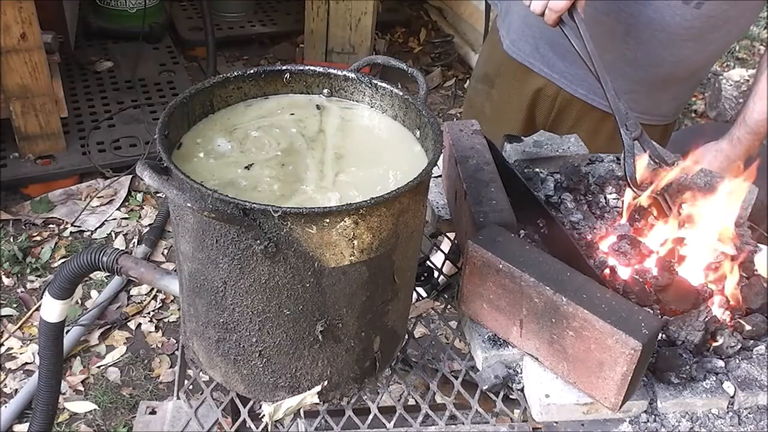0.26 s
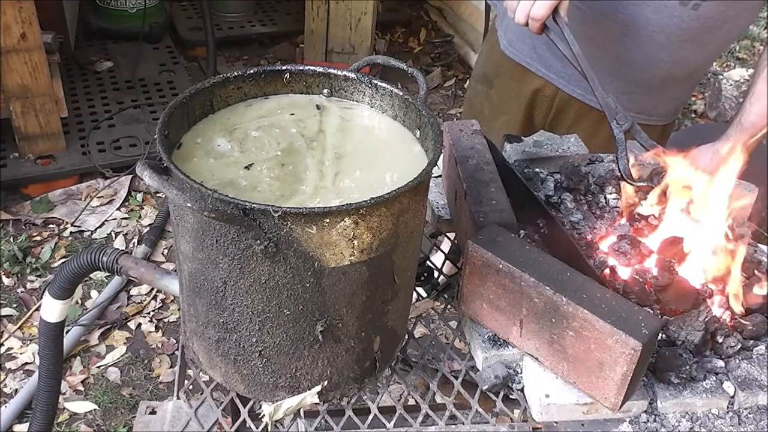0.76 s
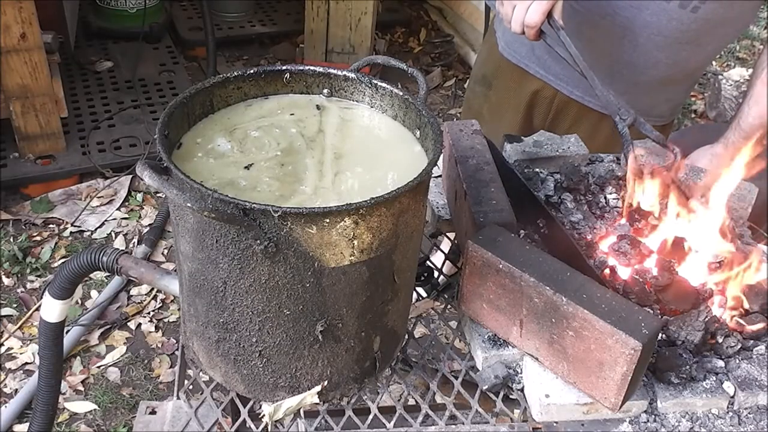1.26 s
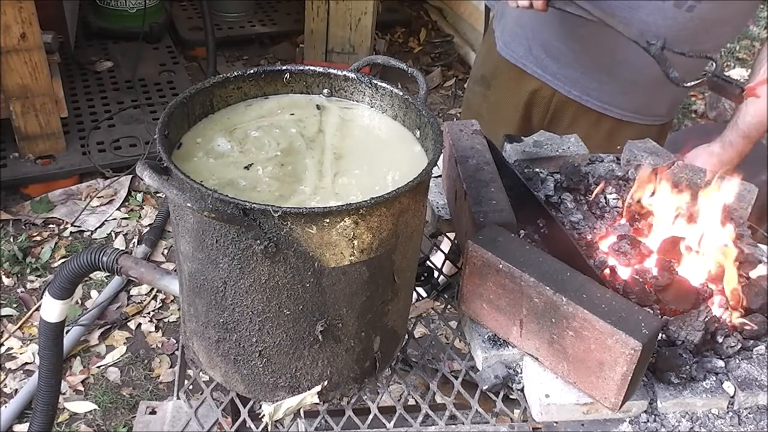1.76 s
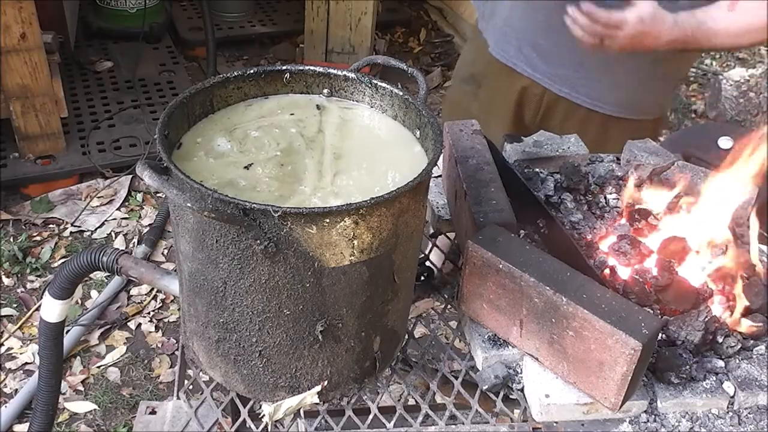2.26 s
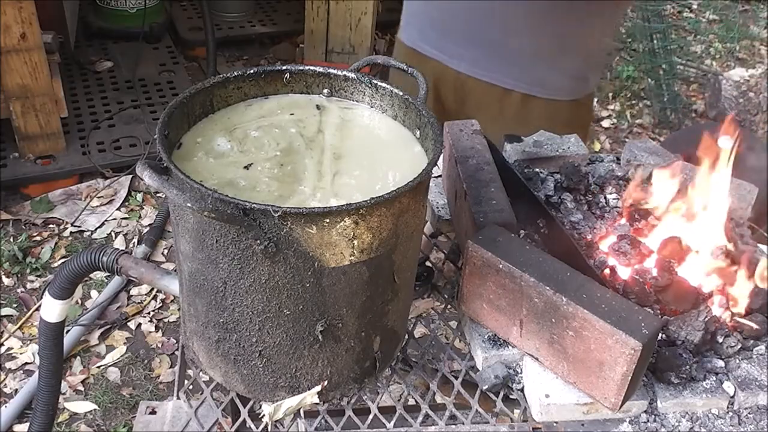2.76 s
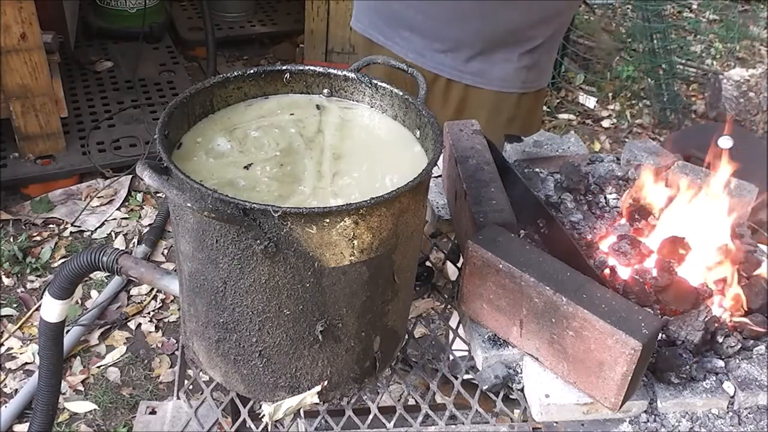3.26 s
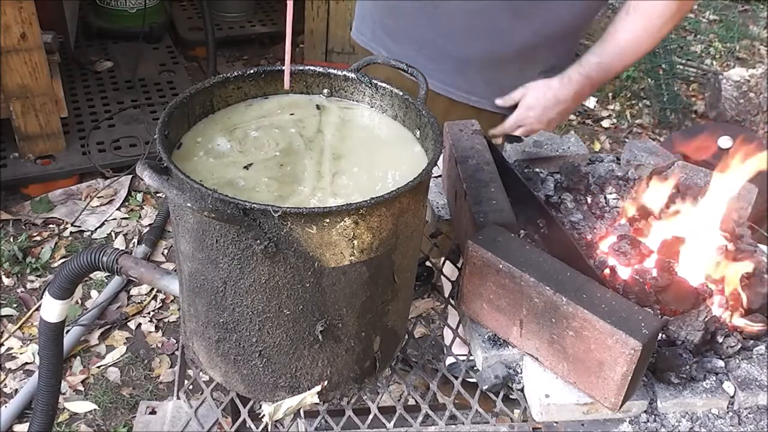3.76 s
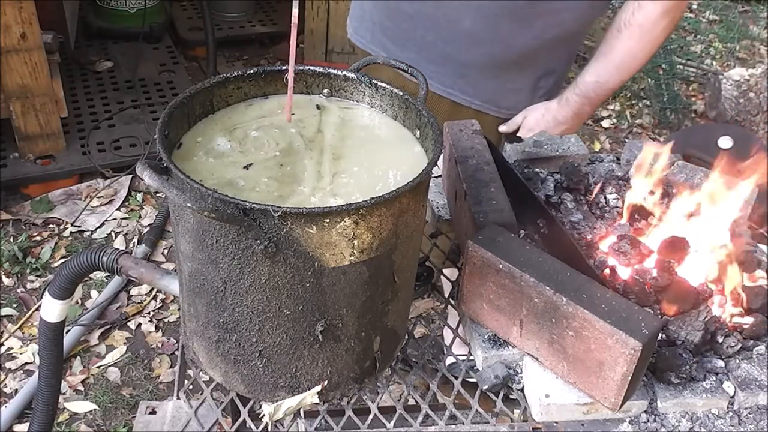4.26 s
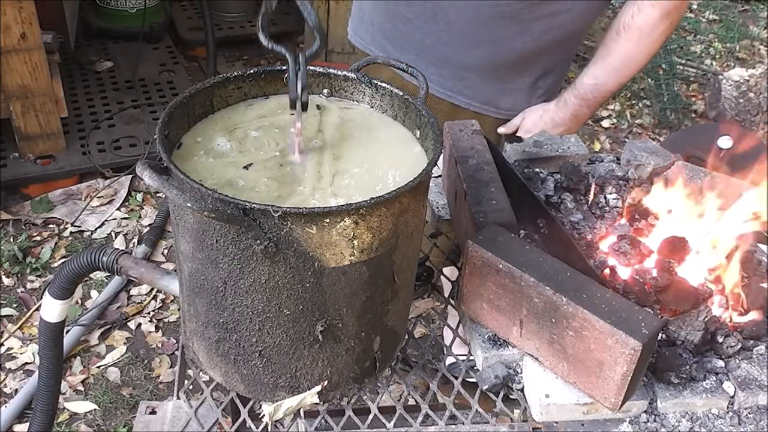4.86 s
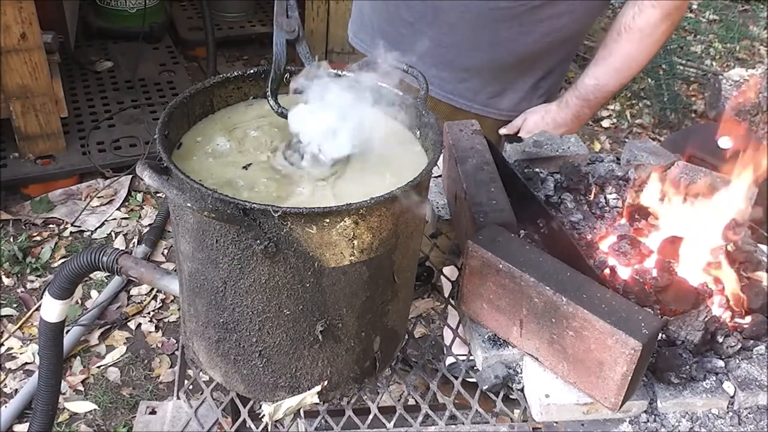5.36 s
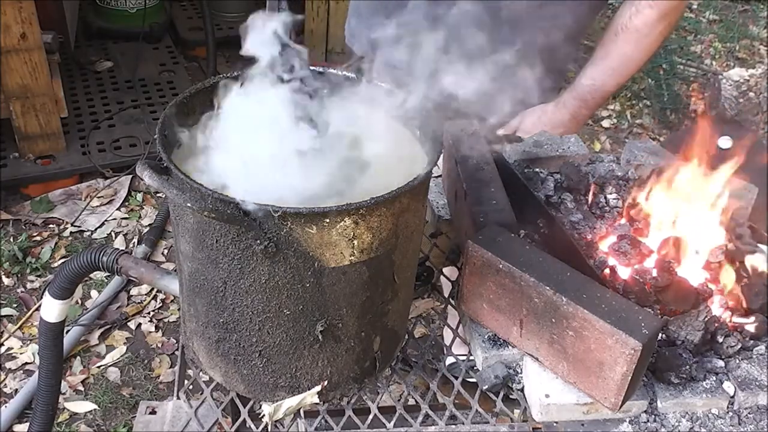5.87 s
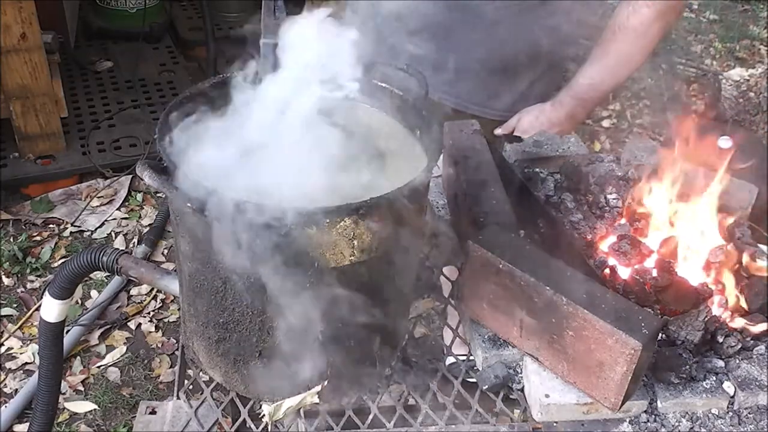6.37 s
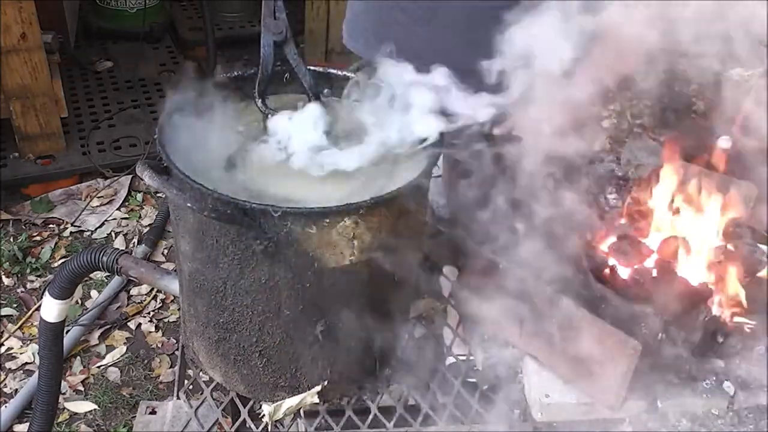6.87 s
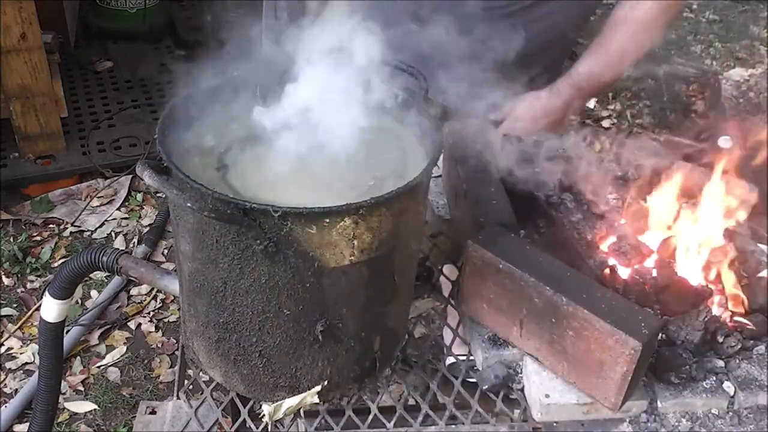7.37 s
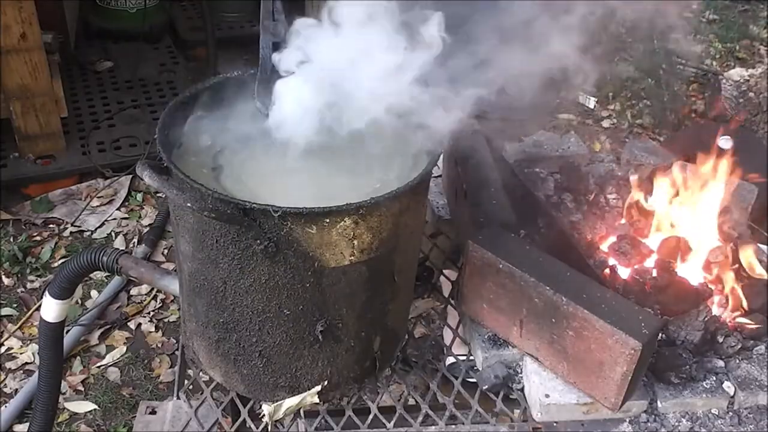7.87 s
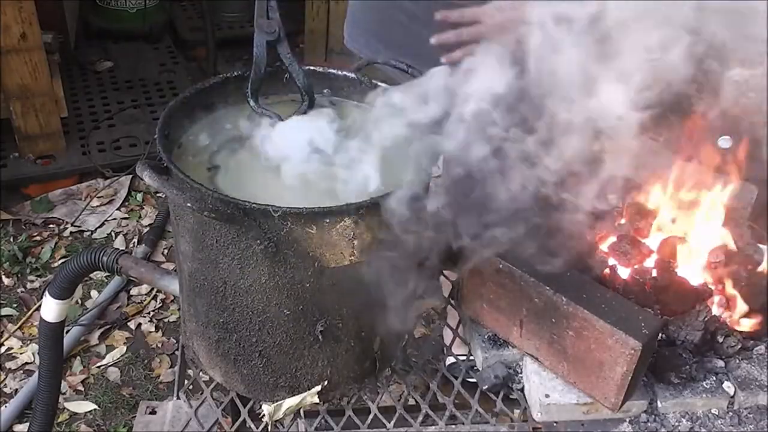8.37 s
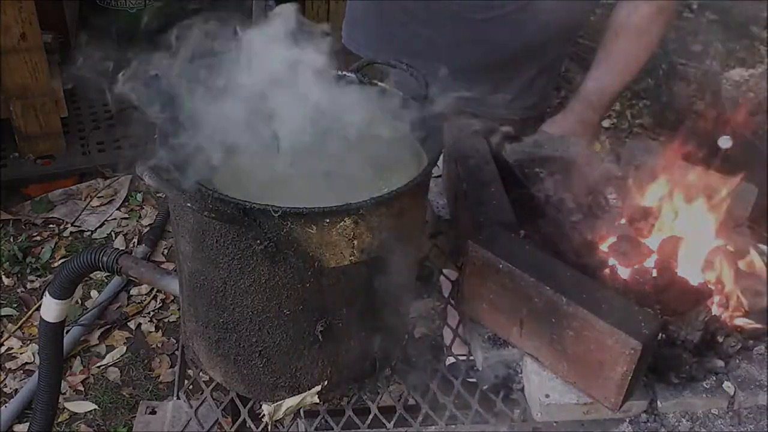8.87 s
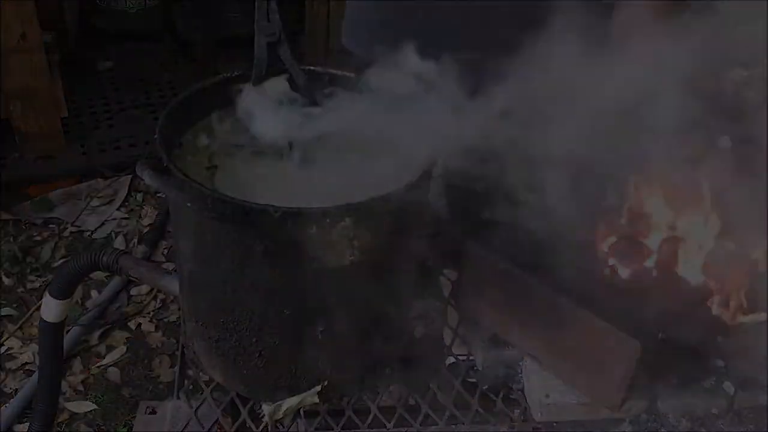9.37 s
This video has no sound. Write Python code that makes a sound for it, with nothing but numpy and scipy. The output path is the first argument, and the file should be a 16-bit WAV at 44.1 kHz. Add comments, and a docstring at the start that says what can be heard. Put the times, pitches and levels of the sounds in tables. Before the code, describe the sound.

Steady whine and airy rush of an outdoor forge blower, joined by the sizzling and sharp spitting of hot steel quenched in oil.

```python
"""An electric blower whines steadily outdoors, pushing air through a hose into a forge fire.
Its passing blades make the tone; the turbulent air rushes and rings in hose and housing.
Beside it, from 5 s, red-hot steel sinks into a pot of oil, which sizzles with bursting bubbles and spits.
Heard close up on a two-port stereo microphone. The level dips briefly at the sharpest spits,
and the whole scene fades from about 6 s."""
import sys
import numpy as np
from scipy import signal
from scipy.fft import rfft, irfft, next_fast_len
from scipy.io import wavfile
from scipy.ndimage import uniform_filter1d

SR = 44100
rng = np.random.default_rng(int(sys.argv[2]) if len(sys.argv) > 2 else 0)


def dump(signal):
    """Clip the signal to [-1, 1] and save it as 16-bit WAV at the path in sys.argv[1]."""
    limited = np.clip(np.atleast_2d(signal).T, -1, 1)
    pcm = np.round(limited * 32767).astype(np.int16)
    wavfile.write(sys.argv[1], SR, pcm)


N = 423801
T = np.arange(N) / SR
N_FFT = next_fast_len(N)
HZ = np.arange(N_FFT // 2 + 1) * SR / N_FFT + 1e-9

# blade-passing tone at the blower: (time [s], pitch [Hz])
BLADE_PITCH = [(0, 580.5), (1, 581.3), (4.4, 582.25), (7.4, 581.3), (8.8, 581.9)]
# its wavering overtones, against the blade tone: (time [s], 2nd [dB], 3rd [dB], 6th [dB])
BLADE_OVERTONES = [(0, -25.5, -30, -42), (.45, -25.5, -31, -44), (.85, -21.5, -32, -43),
                   (2.05, -19.5, -31.5, -47), (2.45, -30, -28.5, -40), (2.7, -18, -27.5, -37),
                   (3.5, -20.5, -37, -35.5), (5.2, -22, -30, -36), (6.1, -26, -34.5, -37),
                   (7.25, -28.5, -42, -36.5), (8.2, -24.5, -41, -37), (9.61, -22, -36, -37)]
# its faint overtones, against the blade tone: (multiple, level [dB])
FAINT_OVERTONES = [(4, -43), (8, -41), (11, -38), (14, -50)]
# thin motor tone, against the blade tone: (time [s], level [dB])
MOTOR_LEVEL = [(0, -23), (2.6, -26), (2.85, -28), (5, -28.5), (9.61, -27.5)]


def blower_whine(motor_hz=1520.5):
    """The blower, close by: passing blades and the motor give clean, slightly wavering sines."""
    phase = 2 * np.pi * np.cumsum(over_time(BLADE_PITCH)[0]) / SR
    blades = undb(.12 * walk(12) + .22 * walk(30)) * np.sin(phase + .02 * walk(40))
    for multiple, db in [*zip((2, 3, 6), over_time(BLADE_OVERTONES)), *FAINT_OVERTONES]:
        blades += undb(db + walk(14)) * np.sin(multiple * phase + .12 * walk(8))
    motor_gain = undb(over_time(MOTOR_LEVEL)[0] + .7 * walk(12))
    motor = motor_gain * np.sin(2 * np.pi * motor_hz * T + .17 * walk(8))
    return to_wave(microphone(rfft(np.sqrt(2) * (blades + motor), N_FFT)))


# colour of the air on its way to the fire: (frequency [Hz], level [dB])
AIR_SPECTRUM = [(28, -14.5), (60, -11), (120, -3), (255, -6.5), (330, 1), (700, 0.5), (1150, -5),
                (1700, -4), (2600, -16), (3300, -14.5), (5000, -3.5), (6800, -10.5), (10500, -7.5),
                (15700, -23)]
# resonances of hose and housing: (frequency [Hz], width [Hz], gain [dB])
HOSE_MODES = [(120, 22, -1.5), (1178, 98, 4), (1733, 30, 1.5), (3660, 90, 3.5), (4100, 76, 4),
              (4480, 68, 1.5), (5050, 50, -1), (5130, 110, 0), (7940, 330, 2.5), (8930, 710, -3),
              (10240, 430, -1.5)]


def air_rush():
    """Turbulent air in the hose: the bass holds steady, the half-octave bands above it gust together."""
    colour = undb(over_hz(AIR_SPECTRUM) + resonances_db(HOSE_MODES))
    air = colour * microphone(*rfft(rng.standard_normal((2, N_FFT))), spread=1)
    gust_db = .5 * walk(32) + .47 * walk(70)
    octave = np.log2(HZ)
    bass = (octave < 9.5) * np.cos(np.pi * np.clip(octave - 9, 0, .5)) ** 2
    out = to_wave(air * bass)
    for centre in np.arange(9.5, 14.6, .5):
        band = np.cos(np.pi * np.clip(octave - centre, -.5, .5)) ** 2  # neighbours sum to one
        flicker_db = .21 * walk(18)
        out += undb(gust_db + flicker_db) * to_wave(air * band)
    return at_rms(out, -13)


# ring of bursting bubbles, the larger ones longer: (pitch [Hz], width [octaves], level [dB])
BUBBLE_RINGS = [(4200, 0.099, 7), (5030, 0.092, 6), (5680, .05, 8), (7450, 0.11, -0.5), (9500, .35, 3),
                (12800, 0.36, 3.5)]
# colour of the sizzling oil: (frequency [Hz], level [dB])
SIZZLE_SPECTRUM = [(1500, -32), (2900, -15), (4200, -7.5), (5500, -4.5), (7000, -10), (10600, 0),
                   (13500, -5), (15700, -10.5)]
# the pot rings along with the oil: (frequency [Hz], width [Hz], gain [dB])
POT_MODES = [(4080, 130, 4), (5680, 150, 6.5), (7860, 400, 3)]
# how hard the oil boils once the steel is in: (time [s], level [dB])
BOIL_LEVEL = [(4.97, -30), (5.1, -8.5), (5.38, -0.5), (5.55, -5.5), (6.05, 0.5), (6.7, -2.5), (7.5, -1.5),
              (8.1, -3.5), (9.61, -2.5)]


def oil_sizzle(count=20000):
    """In the pot beside the blower, bubbles burst, mostly faint, over a hiss that comes in spurts."""
    when, size, sign = rng.random((count, 3)).T
    bursts = undb(np.minimum(-3.5 * np.log(size), 14.5)) * np.sign(sign - .5)
    kinds, index = len(BUBBLE_RINGS), np.arange(count)
    clicks = np.zeros((kinds, 2, N_FFT))  # two unrelated streams for each bubble size
    np.add.at(clicks, (index % kinds, index // kinds % 2, (when * N).astype(int)), bursts)
    bubbles = sum(rfft(streams) * undb(db) / (1 + 1j * np.log2(HZ / hz) / width)
                  for streams, (hz, width, db) in zip(clicks, BUBBLE_RINGS))
    hiss = undb(3 * walk(60) + 2.6 * walk(40)) * rng.standard_normal((2, N))
    oil = at_rms(to_wave(bubbles), 0) + at_rms(hiss, -2.3)
    colour = undb(over_hz(SIZZLE_SPECTRUM) + resonances_db(POT_MODES))
    sizzle = to_wave(colour * microphone(*rfft(oil, N_FFT), spread=.21))
    boil = undb(over_time(BOIL_LEVEL)[0]) * (T > BOIL_LEVEL[0][0])
    return at_rms(sizzle, -14.5) * boil


# the loudest spits from the pot: (time [s], level before the ceiling [dB], pitch [Hz])
LOUD_SPITS = [(5.296, -12, 8600), (5.339, -6.5, 8200), (5.412, -8.5, 7400), (5.626, -10, 5900),
              (5.689, -6, 5900), (5.706, -8.5, 9200), (5.743, -7, 9400), (5.774, -9.5, 7800),
              (5.982, -9.5, 6500), (6.041, -9.5, 7800), (6.112, -8, 12300), (6.188, -8.5, 9200),
              (6.26, -6, 11600), (6.291, -9, 7400), (6.414, -8, 8900), (6.528, -9.2, 5640),
              (6.595, -10, 6400), (6.637, -7, 5600), (6.655, -6, 9900), (6.716, -8, 6190),
              (6.795, -6.5, 8100), (6.813, -7.5, 10600), (6.894, -5, 11100), (6.916, -7, 7700),
              (6.951, -7.5, 9400), (7.001, -6, 7400), (7.085, -10, 5900), (7.284, -8, 5570),
              (7.36, -7.5, 9200), (7.462, -7.5, 5300), (7.485, -5.5, 11300), (7.543, -4.5, 6100),
              (7.624, -10, 6700), (7.711, -6.5, 9000), (7.815, -7.5, 7600), (7.84, -8, 9500),
              (7.937, -7.5, 5970), (8.107, -9.5, 5400), (8.194, -5.5, 9500), (8.303, -7, 8400),
              (8.427, -6.3, 7900), (8.6, -7.2, 7500), (8.688, -10, 7640), (9.048, -10, 5290),
              (9.145, -7.5, 8500), (9.423, -7, 7200), (9.531, -6, 9200)]
SPIT_CEILING_DB = -9


def oil_spits():
    """Each spit is a snap of a cycle or two that returns off the pot wall, louder and at another pitch."""
    out, age = np.zeros(N_FFT), np.arange(60) / SR
    spits = [*LOUD_SPITS, *small_spits()]
    for (time, db, hz), (lag, shift) in zip(spits, rng.random((len(spits), 2))):
        db = min(db, SPIT_CEILING_DB)
        start = int(time * SR) - 12
        echo = (start + int(12 + 10 * lag), hz * (.65 + .52 * shift), db + 9)
        for at, snap_hz, snap_db in ((start, hz, db), echo):
            snap = np.sin(2 * np.pi * snap_hz * age) * np.exp(-age * snap_hz / 1.1)
            out[at:at + len(age)] += undb(snap_db) * snap / snap.max()
    low_cut = HZ ** 2 / (HZ ** 2 + 3500 ** 2)  # small bubbles send out little bass
    return to_wave(low_cut * undb(resonances_db(POT_MODES)) * microphone(rfft(out)))


def small_spits(count=70, from_s=5.2, low_hz=5200, high_hz=9500):
    """Fainter spits at chance moments while the oil boils: (time [s], level [dB], pitch [Hz])."""
    when, size, pitch = rng.random((count, 3)).T
    times = from_s + when * (T[-100] - from_s)
    return np.transpose([times, -15.5 + 5 * (size - .5), low_hz + pitch * (high_hz - low_hz)])


def level_dips(recovery_s=.042):
    """A gain that drops at once by a spit's excess over the ceiling, then creeps back."""
    db = np.zeros(N)
    for time, spit_db, _ in LOUD_SPITS:
        start = int(time * SR)
        excess_db = max(spit_db - SPIT_CEILING_DB, 0)
        db[start:] -= excess_db * np.exp(-(T[:N - start] / recovery_s) ** 2)
    return undb(db)


def faint_whistles(count=70):
    """In the background, short rising whistles are scattered through the rush."""
    out, age = np.zeros(N_FFT), np.arange(1300) / SR
    for when, pitch, glide, faintness in rng.random((count, 4)):
        hz = (3900 + 1500 * pitch) * (1 + 1.8 * glide * age)
        whistle = np.hanning(len(age)) * np.sin(2 * np.pi * np.cumsum(hz) / SR)
        start = int(when * (N - len(age)))
        out[start:start + len(age)] += undb(-26 - 7 * faintness) * whistle
    return to_wave(microphone(rfft(out)))


# how alike the two microphone ports sound: (frequency [Hz], likeness [0-1])
PORT_LIKENESS = [(30, 0.022), (45, .1), (60, 0.54), (130, .97), (290, 1), (640, 1), (1410, 0.7),
                 (3100, 0.91), (6820, 0.61), (9000, 0.17), (11500, 0.32), (15000, .2)]
# left port minus right: (frequency [Hz], level [dB])
PORT_BALANCE = [(25, -6), (110, 0), (380, -.5), (600, 0.3), (1290, 2), (2380, 2.5), (4400, 1), (8120, 4.5),
                (11500, 4.5), (15000, -3)]
# how far the left port leads: (frequency [Hz], phase [rad])
PORT_LEAD = [(0, -1.8), (520, 0.33), (3960, 0.22), (6120, 0.037), (7750, 0.51), (8270, 0.45), (8530, 1),
             (9220, -0.71), (10500, -0.82), (10800, -1.8), (11400, -1.2), (13200, -0.47), (14200, -0.1),
             (15400, 0.047)]


def microphone(source, unrelated=0, spread=0):
    """Spectra at the two ports: the right is phase-shifted, and spread blends unrelated sound into it."""
    share = np.clip(spread * (1 - over_hz(PORT_LIKENESS)), 0, 1)
    right = np.sqrt(1 - share) * source * np.exp(-1j * over_hz(PORT_LEAD)) + np.sqrt(share) * unrelated
    tilt = undb(over_hz(PORT_BALANCE) / 2)
    return np.array([source * tilt, right / tilt])


def undb(db):
    return 10 ** (np.asarray(db) / 20)


def at_rms(x, db):
    return x * undb(db) / np.sqrt(np.mean(x ** 2))


def to_wave(spectrum):
    return irfft(spectrum, N_FFT)[:, :N]


def over_time(table):
    """Every column of a time table, sample by sample."""
    times, *columns = np.transpose(table)
    return [np.interp(T, times, column) for column in columns]


def over_hz(table):
    """A frequency table, bin by bin."""
    hz, value = np.transpose(table)
    return np.interp(np.log(HZ), np.log(hz + 1), value)


def resonances_db(modes):
    """Bell-shaped resonance bumps, bin by bin."""
    return sum(db * np.exp(-((HZ - hz) / width) ** 2) for hz, width, db in modes)


def walk(rate_hz):
    """Random steps, smoothed twice; spread near 1."""
    hold = int(SR / rate_hz)
    steps = np.repeat(rng.standard_normal(N // hold + 1), hold)
    return 1.15 * uniform_filter1d(uniform_filter1d(steps, hold), hold)[:N]


# level at the microphone of everything but the spits: (time [s], level [dB])
BED_LEVEL = [(0, -6.5), (.27, -8), (.45, -7), (2.07, -7.5), (2.45, -7), (2.97, -7.5), (3.4, -7.5),
             (3.72, -8), (4.17, -7), (4.35, -7.5), (4.76, -7), (4.83, -8), (5.9, -9), (6.4, -8)]


def scene(fade_from_s=6.19, fade_to_s=9.927):
    """At the forge: blower and sizzle dip under the loud spits, and all fades in a straight line."""
    bed = blower_whine() + air_rush() + oil_sizzle() + faint_whistles()
    bed_gain = level_dips() * undb(over_time(BED_LEVEL)[0])
    fade = np.clip((fade_to_s - T) / (fade_to_s - fade_from_s), 0, 1)
    return fade * (bed_gain * bed + oil_spits())


def record(dry):
    """Behind the microphone, peaks clip just under full scale and the top is cut steeply near 16 kHz."""
    low_pass = signal.ellip(16, .2, 70, 15950, fs=SR, output="sos")
    return signal.sosfilt(low_pass, np.clip(dry, -.96, .96))


dry = scene()
out = record(dry)
dump(out)
```